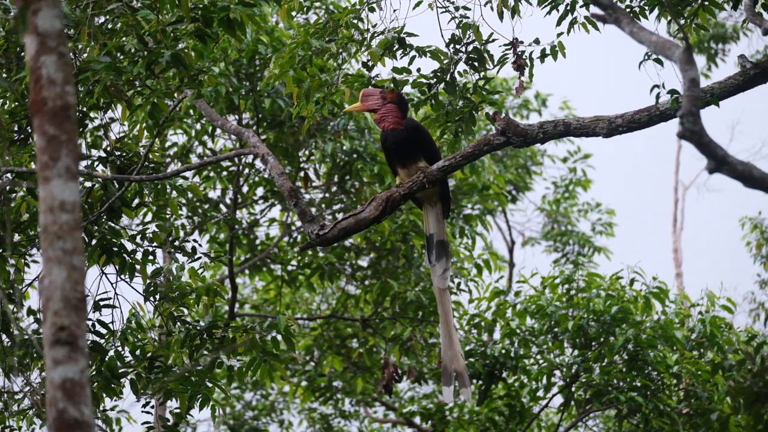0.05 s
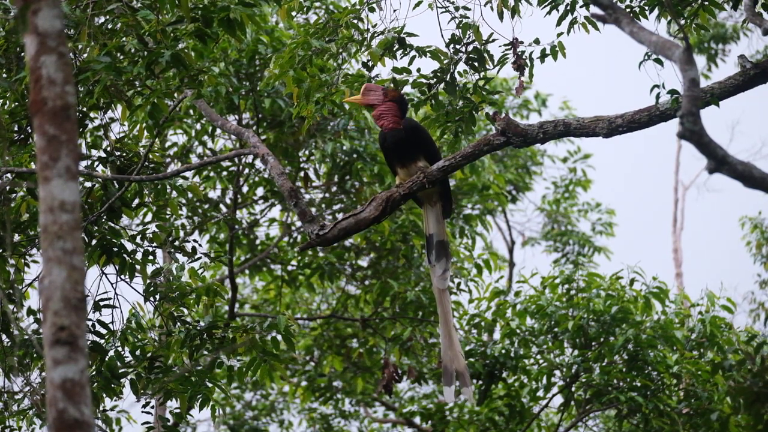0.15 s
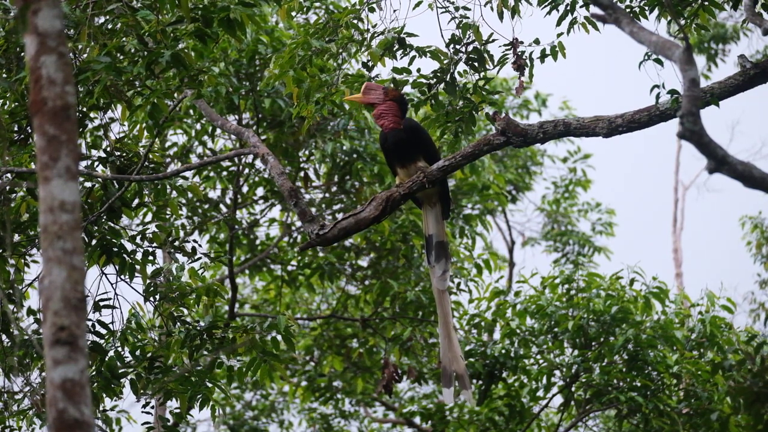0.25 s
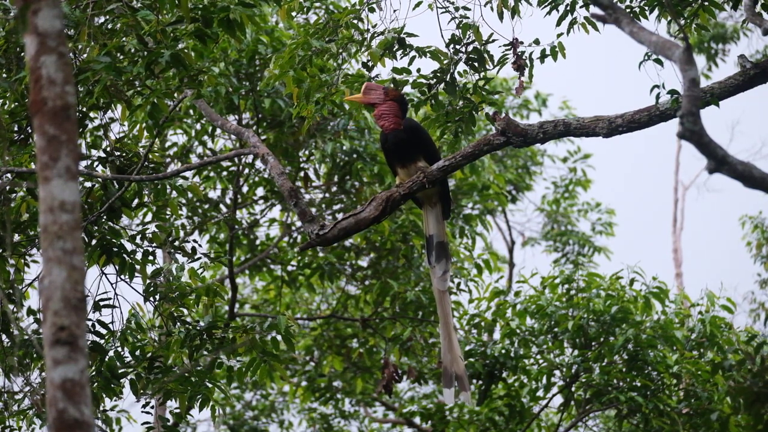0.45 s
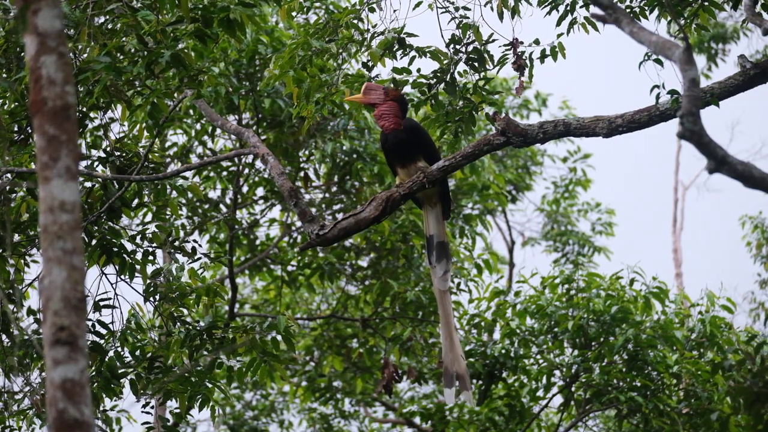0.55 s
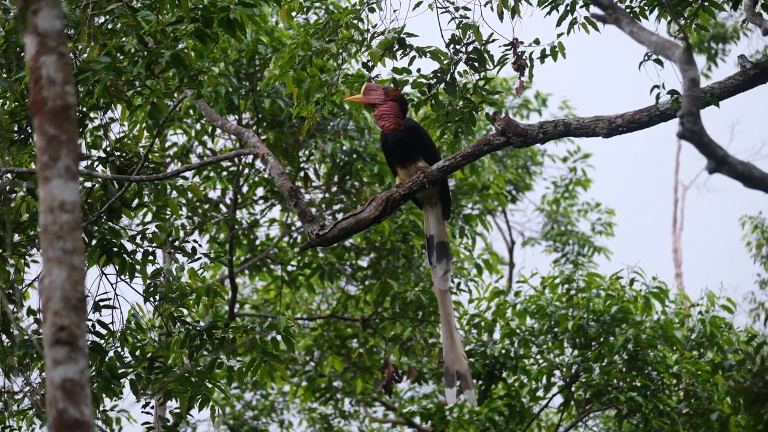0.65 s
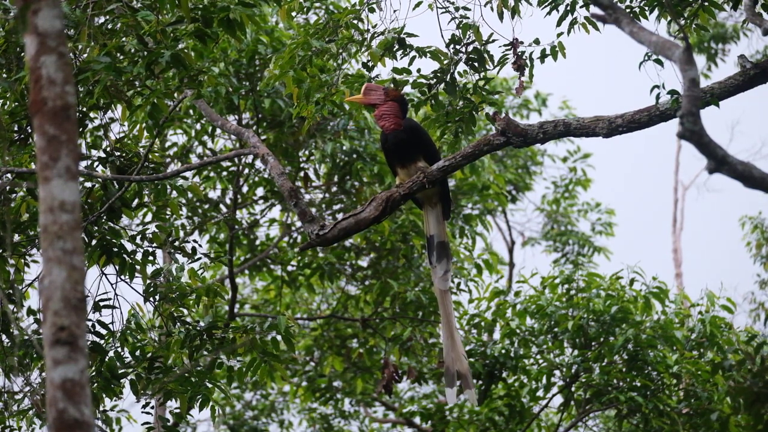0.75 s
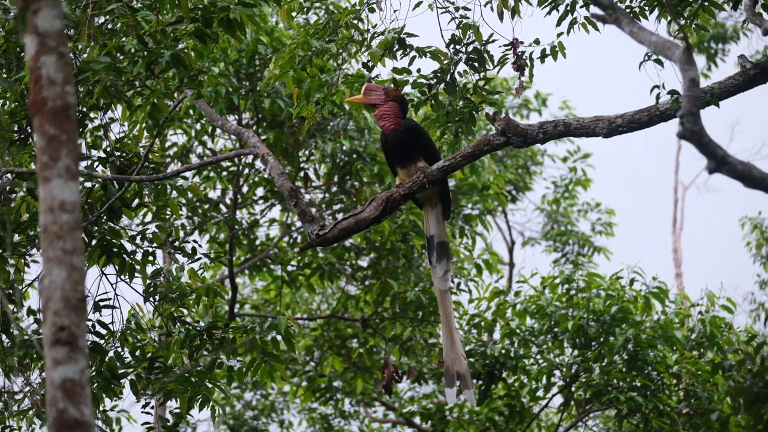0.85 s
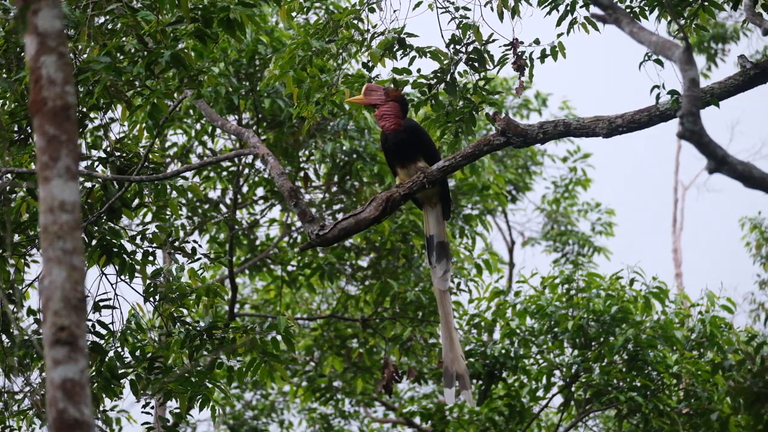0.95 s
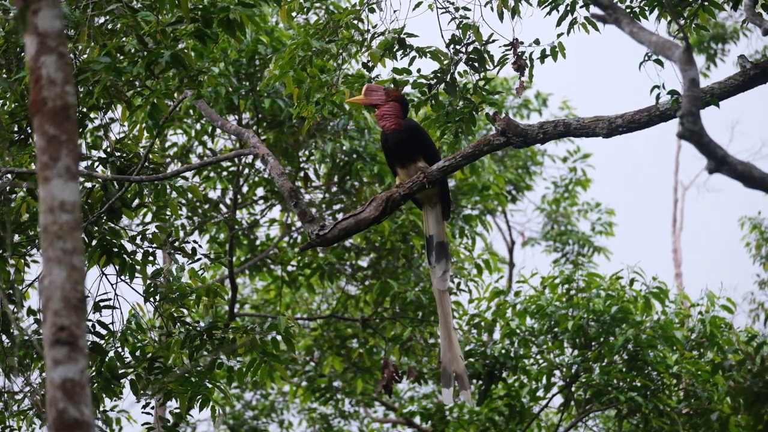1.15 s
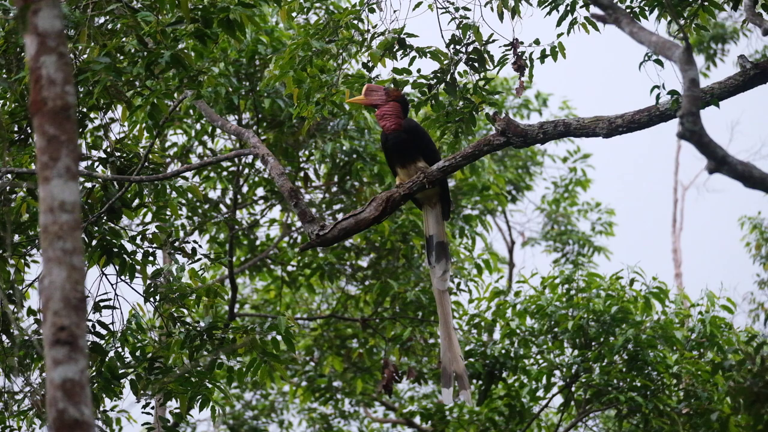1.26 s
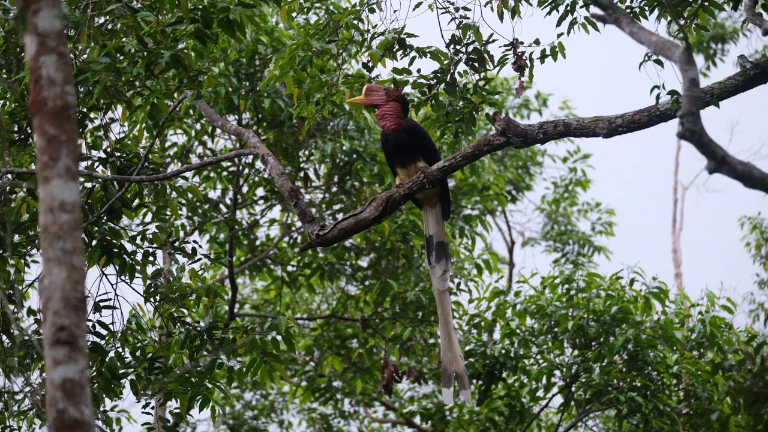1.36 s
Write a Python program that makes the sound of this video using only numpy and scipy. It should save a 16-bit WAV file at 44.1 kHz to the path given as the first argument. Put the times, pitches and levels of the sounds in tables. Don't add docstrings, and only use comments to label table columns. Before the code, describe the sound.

A hornbill's single hollow, mid-low hoot sounds at 0.2 s, lasting under a tenth of a second, sagging slightly, then echoing softly off the trees. A very faint distant answer comes around 0.8-0.95 s. Steady cicada hiss and fast-pulsing crickets continue throughout. Leaf or drip ticks fall mostly left, clearest at 0.38 and 0.67-0.72 s, with slight rustles, tiny far chirps and low air rumble.

```python
import sys
import numpy as np
from scipy import signal
from scipy.fft import rfft, irfft, next_fast_len
from scipy.io import wavfile
from scipy.ndimage import uniform_filter1d, map_coordinates

SR = 44100
rng = np.random.default_rng(int(sys.argv[2]) if len(sys.argv) > 2 else 0)


def invert_db(level):
    return 10 ** (np.asarray(level, dtype=float) / 20)


def digitize_waveform(pressure):
    field = np.atleast_2d(pressure).T
    bounded = np.clip(field, -1, 1)
    quanta = np.round(bounded * 32767).astype(np.int16)
    wavfile.write(sys.argv[1], SR, quanta)


N = 61739
TIME = np.arange(N) / SR

# (frequency [Hz], width [Hz], level [dB])
CICADA_BODY = [(2831, 497, -1.5), (5395, 687, 1), (5780, 660, -3.5), (8270, 1540, -7)]
# (frequency [Hz], width [Hz], level [dB])
CRICKET_BODY = [(3740, 40, -3), (3987, 226, -5), (4270, 220, -9.5)]
# (frequency [Hz], width [Hz], level [dB])
KATYDID_BODY = [(14420, 1900, -2), (15240, 1300, -18)]
CICADA_DB, CRICKET_DB, KATYDID_DB = -39.5, -43.5, -47
CICADA_CLICKS_HZ = 179.9
CRICKET_PEAK_S, CRICKET_SWELL_DB = 0.13, 4.5
KATYDID_PEAK_S, KATYDID_SWELL_DB = 0.052, 3
PULSE_HZ, PULSE_EDGE, PULSE_UNEVEN_DB = 7.284, 1.5, .6

# (frequency [Hz], density [dB per Hz])
HISS_COLOUR = [(150, -69), (250, -9), (600, -11), (1200, -12.5), (1900, -14), (4700, -8.5), (11000, -32.5),
               (16500, -20.5)]
# (frequency [Hz], density [dB per Hz])
RUMBLE_COLOUR = [(15, -34), (30, -9.5), (43, -4.5), (60, -3), (110, -12), (200, -11.5), (400, -26.5)]
# (frequency [Hz], left-right likeness [-1 to 1])
RUMBLE_ALIKE = [(40, 0.57), (70, -1), (130, 0.46), (250, 0.57)]
# (frequency [Hz], left-right likeness [-1 to 1])
FIELD_ALIKE = [(250, 1), (1000, 0.17), (2500, 0.36), (4000, 0.62), (7000, 0.24), (12000, 0.033)]
# (frequency [Hz], left minus right [dB])
BALANCE = [(60, -1.5), (180, 1.5), (550, -0.5), (1650, 1.5), (4970, -0.5), (15000, 3)]
# (start [s], length [s], frequency [Hz], level [dB])
PUFFS = [
    (0, 0.095, 95.5, -53.5),
    (0.471, 0.094, 110, -52.5),
]
HISS_DB, RUMBLE_DB = -46.5, -52
FIELD_LEAD_S = .0001

# (time [s], peak [dB], frequency [Hz], pan [dB])
TICKS = [
    (0.093, -40, 1170, -7),
    (0.382, -27, 2150, 4.5),
    (0.464, -38, 2120, 17),
    (0.673, -28, 970, 6),
    (0.712, -31.5, 1160, 4),
    (0.724, -34.5, 1655, 8),
    (1.225, -62, 2400, 14),
]
# (start [s], length [s], level [dB])
RUSTLES = [
    (0.242, 0.13, -40),
    (0.358, 0.18, -44.5),
    (0.702, 0.031, -42.5),
    (1.047, 0.085, -44.5),
]
# (frequency [Hz], level [dB])
LEAF_COLOUR = [(400, -39), (900, -6), (1500, 1.5), (2400, 2.5), (3500, 5.5), (7000, -16)]
TICK_CYCLES, TICK_DB, TICK_CRACK_DB, TICK_LEAD_S = 4.1, 5.5, -1, 0.00019

# (start [s], length [s], start frequency [Hz], end frequency [Hz], level [dB])
WHISTLES = [
    (.118, 0.033, 359, 693, -53),
    (0.171, 0.027, 650, 610, -56),
    (1.028, 0.019, 693, 1220, -52.5),
    (1.029, 0.051, 1385, 1412, -54),
    (1.047, 0.023, 723, 675, -56),
    (0.699, 0.021, 2650, 2520, -44),
]

# (time [s], frequency [Hz], level [dB])
HOOT = [
    (.198, 484.4, -62),
    (.208, 494.5, -48),
    (.216, 486.7, -40.5),
    (.24, 496.8, -47.5),
    (.258, 487, -42),
    (.274, 436, -38.5),
    (.292, 365, -37.5),
    (.318, 350, -48.5),
    (.333, 310, -58),
]
# (time [s], frequency [Hz], level [dB])
ANSWER = [
    (.9, 544, -70),
    (.928, 508, -55.5),
    (.94, 500, -66),
    (.965, 421, -53.5),
    (.98, 393, -77),
]
# (multiple [1], level [dB])
OVERTONES = [(1, 4), (2, 1), (3, -12.5)]
# (start [s], length [s], frequency [Hz], peak [dB], fullness [1])
BOOMS = [
    (0.1987, 0.073, 493.6, -13.5, 0.89),
    (0.816, 0.12, 536.9, -35, 0.33),
]
# (multiple [1], level [dB])
BOOM_OVERTONES = [(4, -35.5), (5, -41), (6, -35), (8, -41.5)]
# (time [s], frequency [Hz], level [dB], decay [s], rise [s])
SNAPS = [
    (.198, 822, -37.5, 0.0049, 0.0027),
    (.203, 710, -36, 0.0045, 0.0046),
]
# (delay [s], level [dB], pan [dB])
TRUNKS = [
    (.058, -19, 3),
    (.122, -27.5, -4),
    (.205, -28.5, 0),
    (.25, -34, -1.5),
    (.31, -30.5, -1),
    (.352, -37, -1),
    (.45, -52, 0),
    (.56, -36, 2),
]
# (start [s], length [s], level [dB])
FLICKERS = [
    (1.004, 0.045, -47.5),
    (1.093, 0.0205, -46.5),
    (1.12, 0.042, -47.5),
    (1.184, 0.023, -49.5),
    (1.213, 0.024, -51.5),
    (1.308, 0.045, -59),
]
# (delay [s], decay by 60 dB [s], level [dB])
FOREST = [
    (.03, 0.23, -56),
    (.06, 3.2, -26.5),
]
HOOT_PAN_DB, ANSWER_PAN_DB, ANSWER_WET_DB = -2.5, -4.5, 10.5
ANSWER_LEAD_S, ECHO_LEAD_S, STACK_LEAD_S = .00005, 0.00025, .00008
FLICKER_HZ = 537
BREATH_LEAN, OVERTONE_HOLD = 1.1, .8
DRIFT, SAG = 0.012, 0.03
WAVER_DB, WAVER_RAD = .5, .04

TOP_HZ = 15760


def along(points, hz):
    f, v = np.transpose(points)
    return np.interp(np.log(hz + 1), np.log(f + 1), v)


def unit(x):
    return x / np.sqrt(np.mean(x ** 2) + 1e-20)


def filtered(x, response):
    m = next_fast_len(N + SR // 2)
    hz = np.fft.rfftfreq(m, 1 / SR)
    return irfft(rfft(x, m) * response(hz), m)[..., :N]


def wobble(rate):
    knots = rng.standard_normal(int(N * rate / SR) + 4)
    return map_coordinates(knots, [np.arange(N) * rate / SR])


def progress(start_s, length_s):
    return np.clip((TIME - start_s) / length_s, 0, 1)


def panned(x, pan_db):
    return x * invert_db(np.array([[pan_db / 2], [-pan_db / 2]]))


def lead(pair, seconds):
    sides = np.array([[1], [-1]])
    return filtered(pair, lambda hz: np.exp(1j * np.pi * hz * seconds * sides))


def spread(pair, colour, alike):
    def mid_and_side(hz):
        angle = np.arccos(np.clip(along(alike, hz), -1, 1)) / 2
        return colour(hz) * [np.cos(angle), np.sin(angle)]

    mid, side = filtered(pair, mid_and_side)
    return unit(np.array([mid + side, mid - side]))


def body(peaks):
    return lambda f: sum(invert_db(db) * (1j * f * w / (c * c - f * f + 1j * f * w)) ** 2 for c, w, db in peaks)


def clicking(clicks_hz, blur):
    cycles = [np.cumsum(clicks_hz * (1 + .01 * wobble(3))) / SR + rng.random() for _ in range(2)]
    gate = np.exp(-4 * (np.array(cycles) % 1))
    return unit(gate * rng.standard_normal((2, N))) + blur * rng.standard_normal((2, N))


def swell(peak_s, depth_db):
    turn = 2 * np.pi * PULSE_HZ * (TIME - peak_s) + 0.05 * wobble(3.43)
    return invert_db(depth_db * np.tanh(PULSE_EDGE * np.cos(turn)) + PULSE_UNEVEN_DB * wobble(7))


def insects():
    cicadas = spread(clicking(CICADA_CLICKS_HZ, blur=2.2), body(CICADA_BODY), FIELD_ALIKE)
    crickets = spread(clicking(190, blur=0.67), body(CRICKET_BODY), [(4000, 0.58)])
    katydids = spread(clicking(300, blur=1.9), body(KATYDID_BODY), FIELD_ALIKE)
    crickets = unit(swell(CRICKET_PEAK_S, CRICKET_SWELL_DB) * crickets)
    katydids = unit(swell(KATYDID_PEAK_S, KATYDID_SWELL_DB) * katydids)
    cicadas = invert_db(CICADA_DB + 0.23 * wobble(5.43)) * cicadas
    return cicadas + invert_db(CRICKET_DB) * crickets + invert_db(KATYDID_DB) * katydids


def forest_hiss():
    hiss = spread(rng.standard_normal((2, N)), lambda hz: invert_db(along(HISS_COLOUR, hz)), FIELD_ALIKE)
    return invert_db(HISS_DB + 0.78 * wobble(1.56)) * hiss


def port_rumble():
    rumble = spread(rng.standard_normal((2, N)), lambda hz: invert_db(along(RUMBLE_COLOUR, hz)), RUMBLE_ALIKE)
    out = invert_db(RUMBLE_DB + 1.57 * wobble(2.7)) * rumble
    for start_s, length_s, hz, db in PUFFS:
        push = np.sin(np.pi * progress(start_s, length_s))
        out = out + invert_db(db) * push * np.sin(2 * np.pi * hz * TIME)
    return out


def ticks():
    out, t = np.zeros((2, N + SR)), np.arange(SR // 20) / SR
    for s, db, hz, pan_db in TICKS:
        ring = np.sin(2 * np.pi * hz * t) * np.exp(-t * hz / TICK_CYCLES * 3) * (1 - np.exp(-t / 0.0003))
        crack = invert_db(TICK_CRACK_DB) * rng.standard_normal(len(t)) * np.exp(-t / 0.00088)
        tick = ring + uniform_filter1d(crack, size=8)
        first = round(s * SR)
        out[:, first:first + len(t)] += invert_db(db + TICK_DB) * panned(tick, pan_db)
    thin = filtered(out[:, :N], lambda hz: (1j * hz / 600 / (1 + 1j * hz / 600)) ** 2)
    return lead(thin, TICK_LEAD_S)


def rustle():
    stir = sum(invert_db(db) * np.sin(np.pi * progress(s, length)) ** .5 for s, length, db in RUSTLES)
    crackle = rng.standard_normal((2, N)) * invert_db(4.2 * wobble(89.2))
    leaves = stir * spread(crackle, lambda hz: invert_db(along(LEAF_COLOUR, hz)), [(1500, 0.75)])
    return lead(panned(leaves, 2.7), 0.000153)


def whistles():
    out = 0
    for s, length, from_hz, to_hz, db in WHISTLES:
        u = progress(s, length)
        cycles = length * u * (from_hz + (to_hz - from_hz) * u / 2)
        envelope = np.sqrt(2 * np.abs(np.sin(np.pi * u)))
        out = out + invert_db(db) * envelope * np.sin(2 * np.pi * cycles)
    return lead(panned(out, 4.9), .0001)


def boom(s, length, hz, db, fullness):
    u = progress(s, length)
    breath = np.abs(np.sin(np.pi * u ** BREATH_LEAN)) ** fullness
    phase = 2 * np.pi * np.cumsum(hz * (1 - DRIFT * u - SAG * u ** 6)) / SR
    over = sum(invert_db(over_db + 1.3 * wobble(64)) * np.sin(k * phase) for k, over_db in BOOM_OVERTONES)
    return np.sqrt(2) * invert_db(db) * (breath * np.sin(phase) + breath ** OVERTONE_HOLD * over)


def snap(s, hz, db, decay_s, rise_s):
    t = np.clip(TIME - s, 0, None)
    envelope = np.exp(-t / decay_s) * (1 - np.exp(-t / rise_s))
    return 4 * invert_db(db) * envelope * np.sin(2 * np.pi * hz * t + 0.65 * wobble(123))


def call(rows):
    s, hz, level_db = np.transpose(rows)
    smooth = lambda column: uniform_filter1d(np.interp(TIME, s, column), size=260)
    phase = 2 * np.pi * np.cumsum(smooth(hz)) / SR
    stack = 0
    for k, db in OVERTONES:
        level = invert_db(db + WAVER_DB * k * wobble(97.5))
        stack = stack + level * np.sin(k * phase + WAVER_RAD * k * wobble(110))
    return np.sqrt(2) * invert_db(smooth(level_db)) * stack * (TIME > s[0]) * (TIME < s[-1])


def trunks(x):
    n = np.arange(N)
    return sum(invert_db(db) * panned(np.interp(n - s * SR, n, x), pan_db) for s, db, pan_db in TRUNKS)


def forest(x):
    wet = 0
    for delay_s, t60, db in FOREST:
        shared, own = rng.standard_normal(N), rng.standard_normal((2, N))
        decay = invert_db(-60 * TIME / t60 + 1.3 * wobble(26.5))
        onset = np.clip(TIME / delay_s - .5, 0, 1)
        tail = (shared + 0.62 * own) * decay * onset
        tail = tail / np.linalg.norm(tail[0])
        wet = wet + invert_db(db) * signal.fftconvolve(x[None], tail, axes=1)[:, :N]
    return filtered(wet, lambda hz: 1 / (1 + (hz / 2500) ** 2))


def hornbills():
    near, far = [boom(*row) for row in BOOMS]
    stack = call(HOOT) + sum(snap(*row) for row in SNAPS)
    far = far + call(ANSWER)
    flickers = sum(boom(s, length, FLICKER_HZ, db, fullness=1.0) for s, length, db in FLICKERS)
    echoes = lead(trunks(near + stack) + flickers, ECHO_LEAD_S)
    tail = forest(near + stack + invert_db(ANSWER_WET_DB) * far)
    hoot = panned(near, HOOT_PAN_DB) + lead(panned(stack, HOOT_PAN_DB), STACK_LEAD_S)
    answer = lead(panned(far, ANSWER_PAN_DB), ANSWER_LEAD_S)
    return hoot + answer + echoes + tail


def scene():
    sides = np.array([[.5], [-.5]])
    field = lead(insects() + forest_hiss(), FIELD_LEAD_S)
    field = filtered(field, lambda hz: invert_db(along(BALANCE, hz) * sides))
    return field + port_rumble() + ticks() + rustle() + whistles() + hornbills()


def top_cut(x):
    return signal.sosfilt(signal.butter(12, 16410, fs=SR, output="sos"), x)


def record(dry):
    mix = filtered(dry, lambda hz: hz < TOP_HZ)
    return top_cut(mix)


dry = scene()
out = record(dry)
digitize_waveform(out)
```